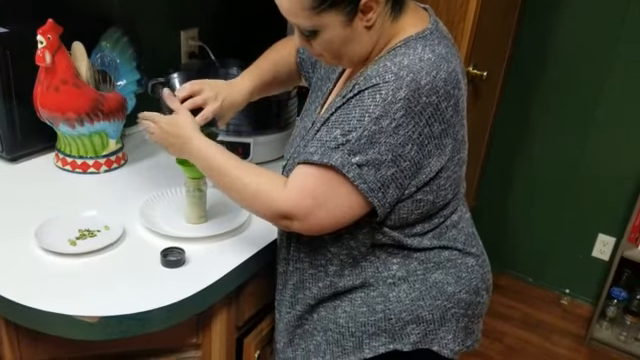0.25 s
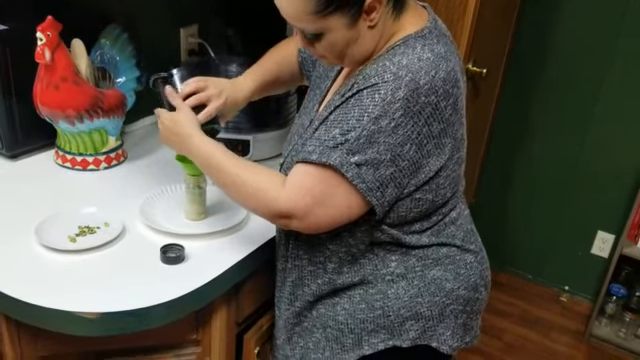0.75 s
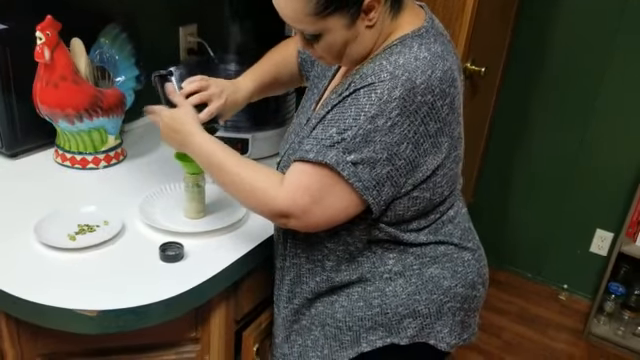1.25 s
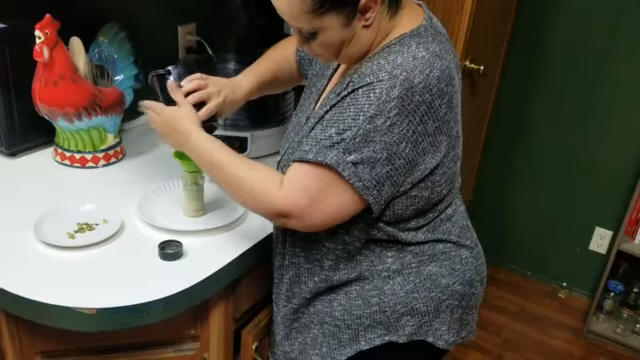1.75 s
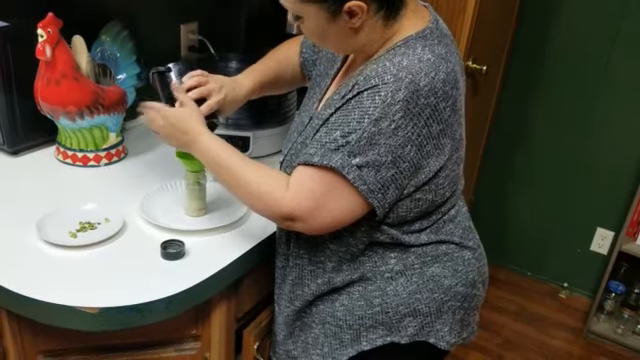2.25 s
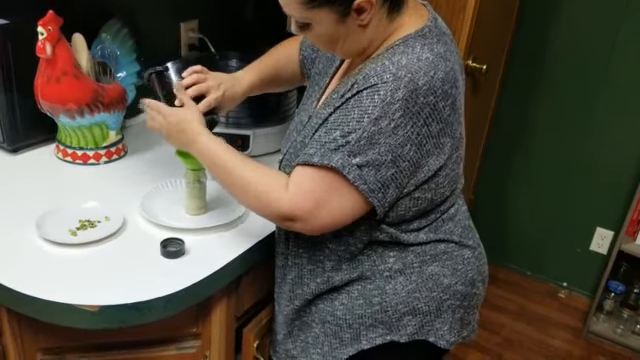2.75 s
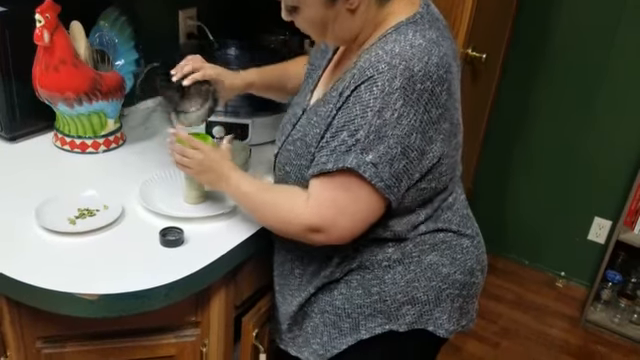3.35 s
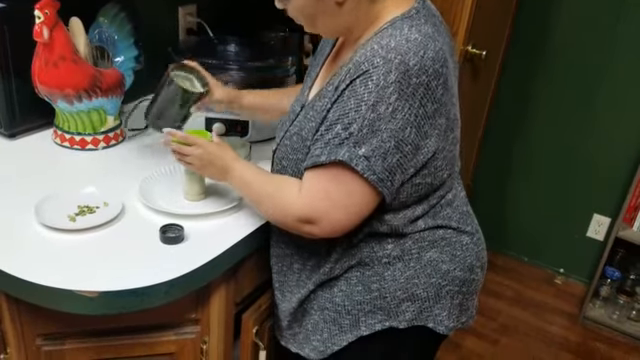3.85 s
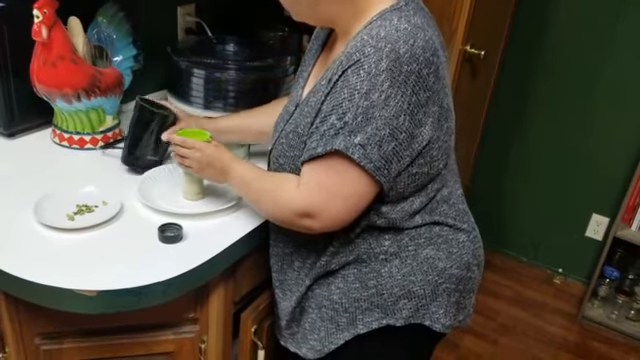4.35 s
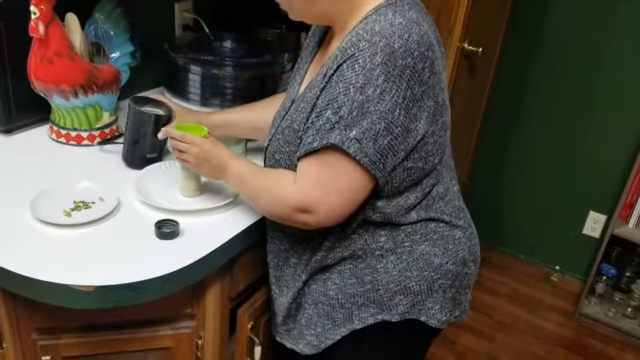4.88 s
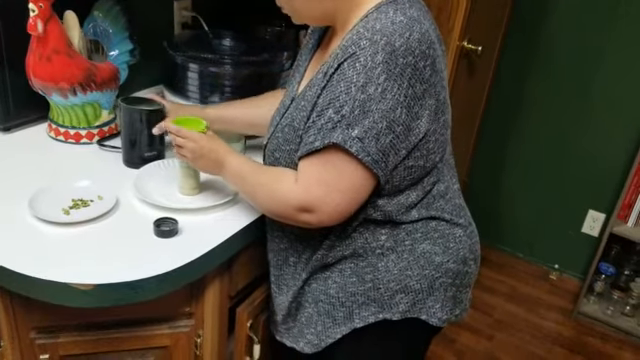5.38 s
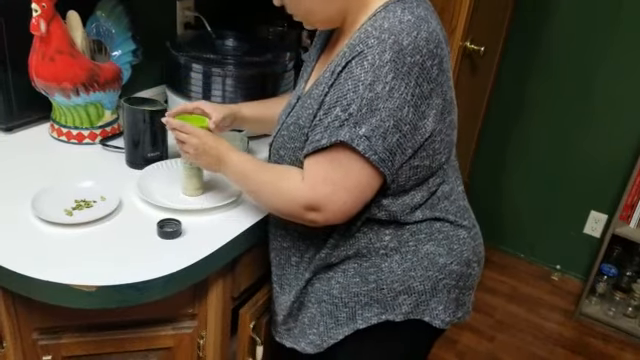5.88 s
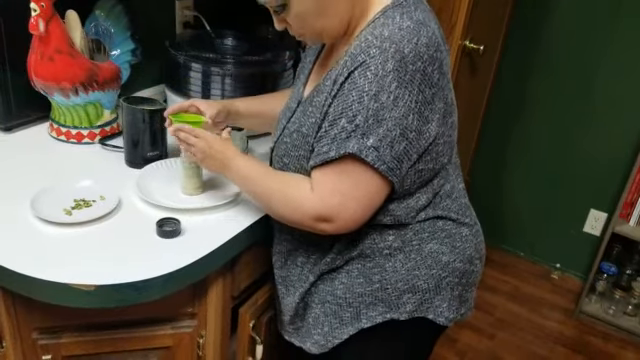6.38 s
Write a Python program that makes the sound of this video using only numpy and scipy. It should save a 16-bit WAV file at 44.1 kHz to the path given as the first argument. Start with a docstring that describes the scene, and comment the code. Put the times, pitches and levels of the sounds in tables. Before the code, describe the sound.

A low appliance hum with a soft rush of air runs throughout in a small kitchen. From the start, a palm pats the hollow plastic side of a spice grinder about five times a second, each pat a light slap with a small thump. The pats grow louder until about 2.9 seconds and end with a soft one just after 3. Fingers slide faintly on the plastic around 3.5 seconds, and the grinder clicks lightly against a plastic funnel four times between 3.7 and 4 seconds. At about 4.3 and 4.6 seconds it lands on the counter with two hard knocks, the loudest sounds, ringing briefly and making the cabinet boom. Two duller, softer bumps follow at 4.9 and 5.2 seconds. A tiny click and another faint slide come near 5.5 seconds, then only the hum remains until about 6.6. The blows sit slightly right, with a short echo.

```python
"""Emptying a spice grinder

A hand pats the hollow side of a grinder held over a plastic funnel, to shake powder into a jar.
Fingers slide on the plastic, the grinder clicks against the funnel, then it lands on the counter
with two hard knocks and settles with two dull bumps that make the cabinet boom.
A small kitchen echoes every blow, and an appliance hums underneath."""
import sys
import numpy as np
from scipy import signal
from scipy.fft import rfft, irfft, next_fast_len
from scipy.io import wavfile

SR = 44100
rng = np.random.default_rng(int(sys.argv[2]) if len(sys.argv) > 2 else 0)


def dump_mix(stems):
    """Bounce the given channels to the path in sys.argv[1] as a 16-bit WAV at rate SR."""
    frames = np.atleast_2d(stems).T  # one column per channel
    limited = np.clip(frames, -1, 1)  # hard clip at full scale
    pcm = np.round(limited * 32767).astype(np.int16)
    wavfile.write(sys.argv[1], SR, pcm)


N = 292118
BLOW_SAMPLES = 2 ** 14
HZ = np.fft.rfftfreq(BLOW_SAMPLES, 1 / SR)

# The broad tone of struck plastic. Each row: frequency in Hz, gain in dB.
PLASTIC_TONE = [(100, -10.5), (180, -11), (260, -1), (450, -2.5), (700, -3.5), (1100, -3.5), (2300, -9.5),
                (4000, -6.5), (6500, -0.5), (8800, -9), (12000, -3.5), (16000, -11.5)]


def amp(db):
    """Turns decibels into a number to multiply by."""
    return 10 ** (np.asarray(db) / 20)


def unit(x):
    """Scales a sound to an average (rms) level of 1."""
    return x / np.sqrt(np.mean(x ** 2) + 1e-20)


def read(points, hz):
    """Reads between the rows of a table, with frequency spaced by octaves."""
    f, value = np.transpose(points)
    return np.interp(np.log(hz + 1), np.log(f + 1), value)


def add(mix, s, sound):
    """Adds a sound to both channels, starting at s seconds."""
    part = mix[:, round(s * SR):][:, :sound.shape[-1]]
    part += sound[..., :part.shape[-1]]


def band(x, lo_hz, hi_hz):
    """Gently turns down everything outside two frequencies."""
    return signal.sosfilt(signal.butter(2, [lo_hz, hi_hz], "band", fs=SR, output="sos"), x)


def colour(curve_db):
    """Makes a filter with these gains along HZ that rings only after a hit, never before."""
    cepstrum = irfft(np.log(amp(curve_db)))
    cepstrum[1:BLOW_SAMPLES // 2] *= 2
    cepstrum[BLOW_SAMPLES // 2 + 1:] = 0
    return np.exp(rfft(cepstrum))


def body(tone, modes):
    """An object's gain in dB: its broad tone, with a bump or dip for each resonance."""
    return read(tone, HZ) + sum(db / (1 + (2 * (HZ - hz) / width) ** 2) for hz, width, db in modes)


def ring(modes):
    """A struck object rings as fading sine waves, scaled by the level of the first 50 ms."""
    t = np.arange(SR) / SR
    sound = sum(amp(db - 60 * t / fade_s) * np.sin(2 * np.pi * hz * t) for hz, db, fade_s in modes)
    return sound / np.sqrt(np.mean(sound[:SR // 20] ** 2))


def room_noise(size):
    """Noise from all sides: left and right are alike in the bass, unrelated in the treble."""
    # How alike the two sides are. Each row: frequency in Hz, likeness from 0 to 1.
    likeness = [(30, .985), (150, .975), (300, .93), (640, .7), (1400, .15), (3000, 0), (16000, 0)]
    left, other = rfft(rng.standard_normal((2, size)))
    same = read(likeness, np.fft.rfftfreq(size, 1 / SR))
    return irfft([left, same * left + np.sqrt(1 - same ** 2) * other], size)


def appliance(mains_hz=120, motor_hz=101.5, waver=0.89, air_db=-53.5, rumble_db=-58):
    """Mains hum, a motor tone and wavering side tones, over rushing air and a faint rumble."""
    # The hum swells and fades with the room's standing waves. Each row: time in seconds, level in dB.
    hum_levels = [(0.06, -41), (0.99, -46), (2.15, -66.5), (2.26, -53), (3.08, -37.5), (4.32, -35.5),
                  (5.69, -40), (6.6, -51.5)]
    # The weaker tones. Each row: pitch in Hz, level in dB that it wavers around.
    weak_tones = [(25.4, -71.5), (76.5, -66.5), (145.3, -54.5), (211.5, -61), (240, -79), (423.5, -68)]
    # The tone of the rushing air. Each row: frequency in Hz, gain in dB.
    air_tone = [(25, -9), (38, -9), (55, -1), (190, -2), (280, -4), (420, -11), (600, -21), (1000, -27),
                (2000, -32.5), (4000, -37.5), (8000, -45), (10000, -42), (12500, -30.5), (15000, -30)]
    t, size = np.arange(N) / SR, next_fast_len(N, True)
    hum = amp(np.interp(t, *np.transpose(hum_levels))) * np.sin(2 * np.pi * mains_hz * t)
    motor_db = np.interp(t, [2.2, 2.44], [-54, -69])  # holds, then sinks to a lower level
    hum += amp(motor_db) * np.sin(2 * np.pi * motor_hz * t)
    turns_s = np.linspace(0, t[-1], num=20)
    for hz, db in weak_tones:
        swell, drift = (np.interp(t, turns_s, v) for v in rng.standard_normal((2, len(turns_s))))
        hum += amp(db) * (1 + waver * swell) * np.sin(2 * np.pi * (hz * t + rng.random()) + drift / 2)
    hum = np.sqrt(2) * hum * amp([[.5], [-.5]])  # a little louder on the left
    air_gain = amp(read(air_tone, np.fft.rfftfreq(size, 1 / SR)))
    air = irfft(rfft(room_noise(size)) * air_gain, size)[:, :N]
    rumble = amp(rumble_db) * unit(band(rng.standard_normal((2, N)), 41, 190))
    return hum + amp(air_db) * unit(band(air, 19, 21000)) + rumble


def kitchen_echo(hit_s, treble_db):
    """The room answers a hit with noise that dies away, the bass lasting longest."""
    # The length of the echo. Each row: frequency in Hz, seconds to fade by 60 dB.
    fade_times = [(60, .58), (200, .26), (550, .38), (1400, .31), (2500, .32), (5000, .31), (9000, .235),
                  (15000, .215)]
    hz, age, slices = signal.stft(room_noise(BLOW_SAMPLES), SR, nperseg=256)
    slices *= amp(-60 * (age - hit_s) / read(fade_times, hz)[:, None])
    slices *= amp(read([(2500, 0.018), (7000, treble_db)], hz))[:, None]
    return signal.istft(slices, SR, nperseg=256)[1][:, :BLOW_SAMPLES]


def blow(body_db, s, level_db, soft, touch, contact_s, crack_db, rise_s, grit, graze_db, echo_treble_db):
    """A graze, a gritty crack and their echo, coloured by the struck object. Gives (start, sound)."""
    # The blows come from the right. Each row: frequency in Hz, left minus right in dB.
    balance = [(150, 1.9), (350, -3), (1000, 0.1), (2500, -4), (5000, -6), (9000, 0), (14000, -1)]
    lead = SR // 80  # samples before the hit
    t = (np.arange(BLOW_SAMPLES) - lead) / SR
    after = np.maximum(t, 0)
    # a soft contact builds more slowly, lasts longer and cracks less than a hard one
    contact_s, rise_s = np.array([contact_s, rise_s]) * (1 + 1.5 * soft ** 2)
    crack = amp(crack_db - 8 * soft) * (after / contact_s) * np.exp(1 - after / contact_s)
    graze = amp(graze_db) * np.exp(-abs(t) / 0.004)  # the surfaces brush just before they meet
    echo = kitchen_echo(lead / SR, echo_treble_db) * (1 - np.exp(-after / rise_s))
    sound = (crack + graze) * room_noise(BLOW_SAMPLES) + echo
    onset = band(sound, 300, 5000)[:, lead:lead + SR // 20]
    sound /= np.sqrt(np.mean(onset ** 2) * SR / 2 / (5000 - 300))
    # they meet in many tiny touches, so each blow has its own uneven colour
    grains = rng.standard_normal(BLOW_SAMPLES) * np.exp(-(t - t[0]) / 0.002)
    uneven = 1 + grit * rfft(grains / np.linalg.norm(grains)) * HZ / (HZ + 600)
    # a soft contact favours the bass, a hard one the treble
    touch_tone = [(hz, hard_db + soft * (soft_db - hard_db)) for hz, hard_db, soft_db in touch]
    tone = colour(body_db + read(touch_tone, HZ))
    # the level is set in the range where the ear is keenest
    heard = np.sqrt(np.mean(amp(body_db) ** 2 * (HZ > 1700) * (HZ < 4000)))
    sides = amp(np.outer([.5, -.5], read(balance, HZ)))
    return s - lead / SR, amp(level_db) / heard * irfft(rfft(sound) * uneven * tone * sides)


def palm_pats(thump_hz=250, thump_fade_s=0.091, free_rim_db=9.5):
    """The palm slaps the grinder's shell about five times a second, each time with a hollow thump."""
    # The pats. Each row: start in seconds, level in dB, softness from 0 to 1,
    # cupping of the palm from 0 to 1, pitch of the trapped air in Hz.
    pats = [(0.087, -57.5, 0.29, 0, 1550), (0.283, -51.5, 0.1, 0.87, 1620), (0.497, -58, 0.2, 1, 1650),
            (0.695, -56.5, 0.18, 0.5, 1110), (0.8804, -47.5, 0.48, 0.7, 1270),
            (1.071, -47.5, 0.34, 0.04, 1120), (1.26, -43, 0.61, 0.48, 1460), (1.464, -44, 0.36, 0.33, 1100),
            (1.658, -46, 0.4, 0.4, 1240), (1.8686, -45.5, 0.51, .15, 1160),
            (2.0756, -46.5, 0.32, 0.7, 1210), (2.2691, -44.5, 0.37, .15, 1130),
            (2.468, -40.5, 0.39, 0.82, 1860), (2.662, -38.5, 0.42, 0.97, 1270),
            (2.8599, -39, 0.45, 0.68, 1710), (3.069, -58, 1, 0, 1630)]
    # The shell's resonances. Each row: pitch in Hz, width in Hz, gain in dB.
    shell_modes = [(271, 125, 5.5), (436.6, 67, 7), (682, 79, -6), (2235, 460, 8), (3835, 530, 3),
                   (4500, 56, -10), (4900, 14, 2), (5930, 123, 2.5), (7160, 470, 2.5)]
    # The rim's resonances. Each row: pitch in Hz, width in Hz, multiple of free_rim_db.
    rim_modes = [(2940, 72, 0.51), (2874, 290, 1.22), (3110, 150, 0.86)]
    # The tone of a pat. Each row: frequency in Hz, gain in dB when hard, gain in dB when soft.
    touch = [(240, -10.5, 11.5), (770, -4, 6.5), (2580, -0.5, 5), (3040, 1, 0.5), (5500, 4, -5.5),
             (13200, 5.5, -4.5)]
    out, t = np.zeros((2, N)), np.arange(SR // 5) / SR
    thump = np.sin(2 * np.pi * thump_hz * t) * amp(-60 * t / thump_fade_s) * (1 - np.exp(-t / .002))
    for s, level_db, soft, cupped, air_hz in pats:
        # a flat palm damps the rim; a cupped one leaves it free and traps air that rings too
        rim = [(hz, width, share * cupped * free_rim_db) for hz, width, share in rim_modes]
        air = [(air_hz, 210, 4 + 8 * cupped)]
        shell = body(PLASTIC_TONE, list(shell_modes) + rim + air)
        add(out, *blow(shell, s, level_db, soft, touch, contact_s=0.0015, crack_db=2.5,
                       rise_s=0.0024, grit=0.48, graze_db=-13.5, echo_treble_db=-1.3))
        add(out, s, amp(level_db + 7 + 8 * soft) * thump)  # softer pats thump more
    return out


def finger_slides():
    """Skin slides briefly over the shell with a narrow hiss."""
    # The slides. Each row: start in seconds, length in seconds, level in dB at the loudest point.
    slides = [(3.453, 0.15, -66), (5.457, .14, -66.5)]
    out = np.zeros((2, N))
    for s, length, db in slides:
        size = round(length * SR)
        add(out, s, amp(db) * unit(band(room_noise(size), 2400, 3540)) * np.hanning(size))
    return out


def funnel_clicks():
    """Plastic taps plastic as the grinder is turned upright and let go."""
    # The light taps. Each row: start in seconds, level in dB, softness from 0 to 1.
    clicks = [(3.7, -56.5, 0.88), (3.8515, -50, 0.79), (3.9134, -42, 0.33), (3.994, -48.5, 0.57),
              (4.302, -71, .1), (5.42, -67, 0.17)]
    # The funnel's resonances. Each row: pitch in Hz, width in Hz, gain in dB.
    funnel_modes = [(850, 150, 6), (1130, 150, 7), (2020, 200, 4)]
    # The tone of a tap. Each row: frequency in Hz, gain in dB when hard, gain in dB when soft.
    touch = [(240, -2, 1), (900, -7, 9), (2400, 0, 0), (5500, 2, -20), (12000, 4, -36)]
    out, funnel = np.zeros((2, N)), body(PLASTIC_TONE, funnel_modes)
    for s, level_db, soft in clicks:
        add(out, *blow(funnel, s, level_db, soft, touch, contact_s=0.0016, crack_db=5,
                       rise_s=.003, grit=.4, graze_db=-16, echo_treble_db=0))
    return out


def counter_knocks(second_edge_s=.012, second_edge_db=-8, case_db=-8):
    """The base lands on one edge, then the other; the grinder rings and the cabinet booms."""
    # The landings. Each row: start in seconds, level in dB, softness from 0 to 1.
    knocks = [(4.3463, -22, 0), (4.5823, -21.5, 0.08), (4.882, -44, 0.65), (5.196, -52, 0.63)]
    # The broad tone of grinder and counter together. Each row: frequency in Hz, gain in dB.
    counter_tone = [(30, -30), (60, 3.5), (150, 3), (260, -2.5), (400, -14.5), (700, -21.5), (1500, -18),
                    (2400, -14), (3600, -19.5), (5800, -26), (8000, -28.5), (13000, -30), (16000, -41)]
    # Their resonances. Each row: pitch in Hz, width in Hz, gain in dB.
    counter_modes = [(390, 210, 9.14), (547, 4.4, 4.5), (617, 40, 2), (790, 98, 9), (934, 150, 8.5),
                     (1136, 94, 4), (1200, 17, 0.9), (1538, 50, 2.5), (1490, 29, 2.6), (1970, 96, 4.5),
                     (2150, 39, 10), (2385, 55, 3.6), (2550, 38, 3.5), (3080, 53, 0.46), (5042, 340, 4.4),
                     (5660, 750, 11)]
    # The tone of a landing. Each row: frequency in Hz, gain in dB when hard, gain in dB when soft.
    touch = [(60, -3, 10), (240, -4, 19), (380, -1, 9), (800, -1.5, 6), (1600, 1.5, 1), (2400, 0, 0),
             (5500, -1, -22), (10000, 2, -38)]
    # Counter top and cabinet booming. Each row: pitch in Hz, relative level in dB, seconds to fade 60 dB.
    boom_modes = [(67, -3.5, 0.12), (80, -1.5, 0.56), (110, -8, 0.36), (134.4, -4, 0.97), (155.5, 8, 0.36),
                  (194, 0, .3), (199.6, 4.5, 0.24)]
    # The grinder's case ringing. Each row: pitch in Hz, relative level in dB, seconds to fade 60 dB.
    case_modes = [(620, -5, 0.29), (1095, 2.5, 0.19), (1244, -10.5, 0.25), (1644, -6, 0.11),
                  (2003, -1, 0.32), (2430, -5.5, 0.12), (2676, 1, 0.17)]
    out, counter = np.zeros((2, N)), body(counter_tone, counter_modes)
    boom = ring(boom_modes) * (1 - np.exp(-np.arange(SR) / SR / 0.004))
    case = amp(case_db) * ring(case_modes)
    for s, level_db, soft in knocks:
        for edge_s, edge_db in (s, level_db), (s + second_edge_s, level_db + second_edge_db):
            add(out, *blow(counter, edge_s, edge_db, soft, touch, contact_s=0.0032, crack_db=4.5,
                           rise_s=0.0021, grit=0.32, graze_db=-30, echo_treble_db=-2.5))
        add(out, s, amp(level_db) * (amp(2 + 19 * soft) * boom + case))  # a soft landing is mostly boom
    return out


def scene():
    """Everything that sounds in the kitchen, added together."""
    return appliance() + palm_pats() + finger_slides() + funnel_clicks() + counter_knocks()


def record(dry):
    """Clips any peak beyond full scale, then cuts the treble above 16100 Hz."""
    low_pass = signal.firwin(511, 16100, window=("kaiser", 9), fs=SR)
    return signal.oaconvolve(np.clip(dry, -1, 1), low_pass[None], "same")


dry = scene()
out = record(dry)
dump_mix(out)
```